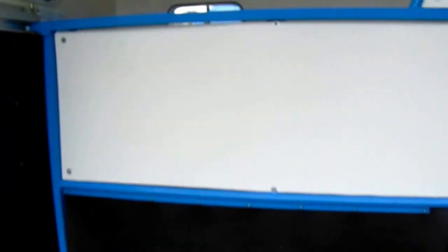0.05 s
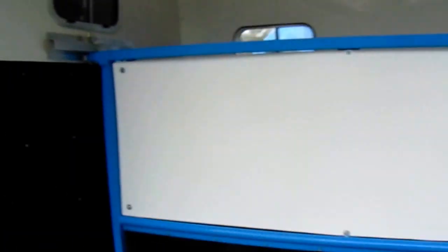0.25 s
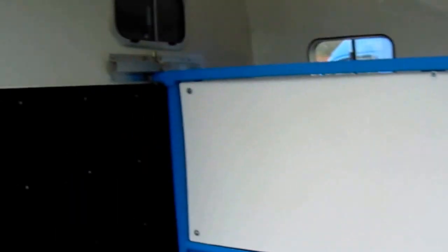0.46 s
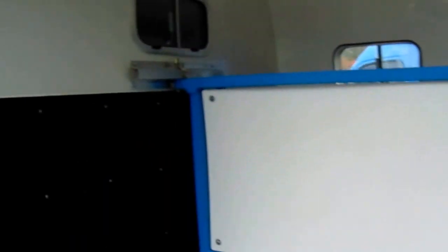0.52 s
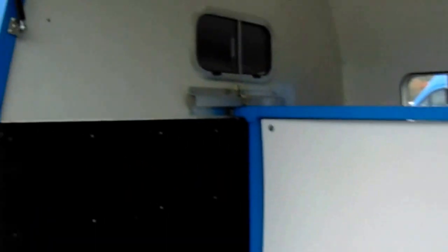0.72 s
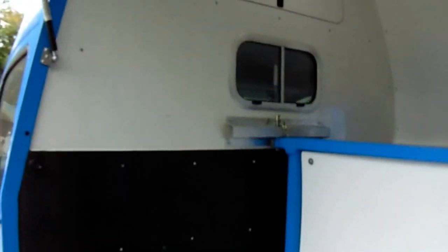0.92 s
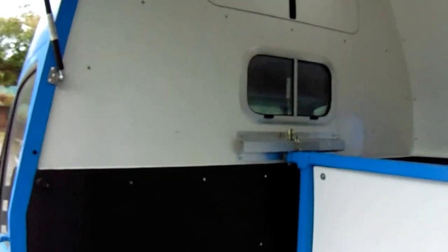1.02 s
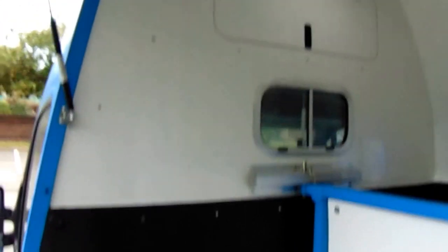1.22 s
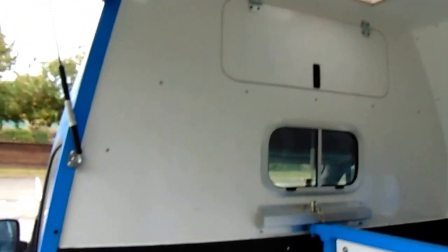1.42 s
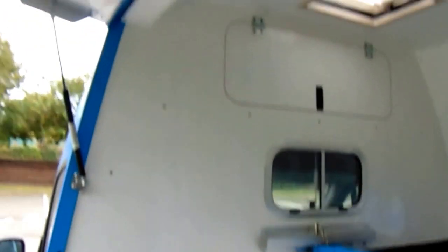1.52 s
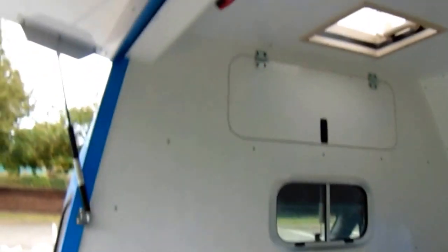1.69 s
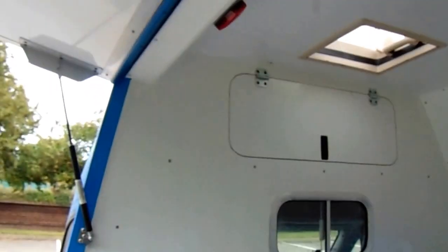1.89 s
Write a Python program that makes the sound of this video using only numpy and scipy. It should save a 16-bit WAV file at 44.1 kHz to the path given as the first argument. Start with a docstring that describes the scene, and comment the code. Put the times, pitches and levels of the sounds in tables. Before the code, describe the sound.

A van door bangs shut, heard from inside, followed by two soft footsteps.

```python
"""A door bangs shut on a parked van, heard from inside its bare load box.
The impact excites damped modes of the panels and a low boom of the enclosed air; the door
rebounds on its seal and the latch chatters. Two soft footfalls and faint rustles of cloth follow.
Distant traffic, a fine hiss, a thin whine and a little wind come in through the open side."""
import sys
import numpy as np
from scipy import signal
from scipy.fft import rfft, irfft
from scipy.io import wavfile

SR = 44100
rng = np.random.default_rng(int(sys.argv[2]) if len(sys.argv) > 2 else 0)


def store_pcm(level_fs):
    """Save levels as 16-bit WAV."""
    pcm = np.round(np.clip(level_fs, -1, 1) * 32767).astype(np.int16)
    wavfile.write(sys.argv[1], SR, np.atleast_2d(pcm).T)


N = 85995
T = np.arange(N) / SR
PANEL_ONSET_S = 0.2155

# Door meeting its frame: start_s, level_db, tilt_db_per_octave
DOOR_BLOWS = [(.2134, -4.5, 1.5), (.2168, 0.5, -0.5), (.2195, 0, 1.85), (.2268, -4, 0.5)]
# Crash spectrum of the door skin: frequency_hz, relative_db
CRASH_SPECTRUM = [(40, -20), (120, -24), (225, 2.5), (400, -9.5), (730, -3), (1150, -3.5), (1480, -9.5),
                  (1900, -9.5), (2600, -20), (3100, -14.5), (3900, -16.5), (4750, -26), (8000, -33),
                  (14000, -44)]
# Decay of the crash: frequency_hz, t60_s
CRASH_DECAY = [(100, 0.45), (300, 0.42), (700, 0.31), (1500, .22), (3500, 0.13), (12000, 0.2)]
# Modes of the wall panels and box: pitch_hz, level_db, t60_s
PANEL_MODES = [(76.3, -25, 0.63), (128.7, -24, 0.57), (172.4, -25, 0.665), (201.4, -18, .27),
               (270.4, -32.5, 0.47), (329.7, -21.5, 0.37), (448.5, -25.5, 0.43), (520, -30, 0.33),
               (605, -21.5, .2), (672, -33.5, 0.62), (722.3, -14, 0.17), (880.5, -29, .42),
               (922, -28, 0.38), (1006, -19, 0.17), (1164, -28, .3), (1200, -22, 0.25), (1757, -31, 0.45),
               (3450, -52, 0.072)]
# Door rebounding on its seal: start_s, level_db, tilt_db_per_octave
SEAL_REBOUNDS = [(.2532, -1, -2.5), (.2772, -2, 0), (.3110, -9.5, 1), (.3400, -9.5, -1.)]
# Dull spectrum of the rebounds and the swing: frequency_hz, relative_db
THUMP_SPECTRUM = [(40, -14), (130, 6.5), (330, 4.5), (800, -5.5), (1600, -17), (3500, -31), (12000, -58)]
THUMP_DECAY = [(100, 0.28), (2000, 0.051)]  # frequency_hz, t60_s
# Latch contacts: start_s, level_db, tilt_db_per_octave
LATCH_BLOWS = [(.2950, -8, 7), (.2997, -0.5, -.5), (.3020, -2.5, -1.5)]
# Latch resonances: frequency_hz, relative_db
LATCH_SPECTRUM = [(500, -8), (1550, 4), (2200, -2), (3200, -11), (4300, -5), (4750, 1), (5300, -1.5),
                  (6100, -14), (6900, -35), (14000, -22)]
LATCH_DECAY = [(1500, 0.23), (6000, 0.11)]  # frequency_hz, t60_s
# Feet on the floor: start_s, level_db, tilt_db_per_octave
FOOT_BLOWS = [(.8022, -2.5, -0.5), (1.5835, -4, 2)]
# Floor resonances: frequency_hz, relative_db
FLOOR_SPECTRUM = [(50, -25), (130, -3.5), (200, -5), (335, 1), (650, -5.5), (880, 0.5), (1400, -9),
                  (3500, -31), (12000, -47)]
FLOOR_DECAY = [(100, 0.37), (2000, 0.18)]  # frequency_hz, t60_s
# Slides of cloth: start_s, length_s, level_db, tilt_db_per_octave
CLOTH_SLIDES = [(0.414, 0.12, -44, 2), (.5, 0.12, -46.5, -1), (0.669, 0.043, -48, 6.),
                (0.907, 0.093, -46.5, 11)]
# Cloth friction spectrum: frequency_hz, relative_db
CLOTH_SPECTRUM = [(1500, -26), (3500, -3), (5200, 2.5), (6500, -13), (9800, -8.5), (14000, -15.5)]
# Far traffic spectrum: frequency_hz, relative_db
TRAFFIC_SPECTRUM = [(60, -17), (120, -10), (175, -9), (274, -4.5), (360, -8), (580, -7.5), (790, -1),
                    (1180, -2.5), (1700, -7), (2500, -13), (4000, -20.5), (7000, -27.5), (14000, -38)]
# Swell of the traffic: time_s, level_db
TRAFFIC_LEVELS = [(0, -39.5), (.15, -36), (.4, -38), (.7, -38.5), (1.1, -38.5), (1.4, -38), (1.95, -37.5)]
# Wind rumble spectrum: frequency_hz, relative_db
WIND_SPECTRUM = [(10, -8.5), (22, -8), (35, -1.5), (55, -7.5), (80, -2.5), (105, -12), (200, -23.5),
                 (500, -47), (2000, -80)]
# Gusts: time_s, level_db
WIND_LEVELS = [(0, -32.5), (.08, -35), (.17, -42.5), (.45, -39.5), (.72, -42), (.9, -41), (1.02, -45),
               (1.55, -45.5), (1.68, -39), (1.86, -36.5), (1.95, -41)]
# Flat hiss spectrum: frequency_hz, relative_db
HISS_SPECTRUM = [(1000, -1), (7000, -1), (14000, -1)]
# Drift of the hiss: time_s, level_db
HISS_LEVELS = [(0, -50.5), (.15, -47.5), (.35, -48.5), (.8, -53.5), (1.15, -52), (1.55, -50.5), (1.95, -55)]
# Partials of the whine: start_s, length_s, first_hz, last_hz, level_db
WHINE_PARTIALS = [(1.22, 0.48, 12200, 11680, -62), (1.24, 0.45, 10600, 10830, -64.5),
                  (1.38, 0.46, 10330, 9940, -62), (1.377, 0.49, 5980, 6070, -61.5),
                  (1.58, 0.2, 11050, 11100, -62), (1.328, .42, 14050, 14030, -63)]


def door_crash():
    """Impact excitation: brief contacts with the frame drive the door skin over a wide band."""
    return amp(11.5) * impacts(DOOR_BLOWS, CRASH_SPECTRUM, CRASH_DECAY, build_s=0.0003, direct_db=-8)


def door_swing(length_s=0.032):
    """Air displacement: a dull rush grows just before the door lands."""
    ramp = np.clip(1 - (PANEL_ONSET_S - T) / length_s, 0, 1) * (T < PANEL_ONSET_S)
    return amp(-32.5) * noise(THUMP_SPECTRUM) * ramp


def panel_ring(rise_s=0.001):
    """Modal superposition: the struck panels ring as a sum of damped sinusoids."""
    ring = sum(amp(db) * decay(T, t60_s) * np.sin(2 * np.pi * (hz * T + rng.random()))
               for hz, db, t60_s in PANEL_MODES)
    attack = 1 - np.exp(-T / rise_s)
    return place(PANEL_ONSET_S, amp(1) * ring * attack)


def seal_rebounds():
    """Elastic rebound: the door bounces on its soft seal in dull thumps."""
    return amp(8) * impacts(SEAL_REBOUNDS, THUMP_SPECTRUM, THUMP_DECAY, build_s=0.00085, direct_db=-5.5)


def latch_chatter():
    """Hard contact: quick blows excite the high resonances of the latch."""
    return amp(-3) * impacts(LATCH_BLOWS, LATCH_SPECTRUM, LATCH_DECAY, build_s=0.00043, direct_db=-0.5)


def air_boom(start_s=0.2285, pitch_hz=38.2, rise_s=0.039, t60_s=0.57):
    """Cavity resonance: air squeezed into the box oscillates slowly and dies away."""
    envelope = np.minimum(T / rise_s, 1) * decay(T, t60_s)
    return place(start_s, amp(-17.5) * envelope * np.sin(2 * np.pi * pitch_hz * T))


def footfalls():
    """Structure-borne sound: soft steps excite the hollow floor."""
    return impacts(FOOT_BLOWS, FLOOR_SPECTRUM, FLOOR_DECAY, build_s=0.0016, direct_db=-10)


def clothing(ramp_s=0.023, fade_db=-4):
    """Sliding friction: cloth gives short bursts of noise that swell and fade."""
    out = np.zeros(N)
    for start_s, length_s, db, tilt_db in CLOTH_SLIDES:
        t = T[:round(length_s * SR)]
        edges = np.clip(np.minimum(t, length_s - t) / ramp_s, 0, 1)
        friction = unit(colour(rng.standard_normal(N), CLOTH_SPECTRUM, tilt_db))[:len(t)]
        out += place(start_s, amp(db + fade_db * t / length_s) * edges * friction)
    return out


def traffic():
    """Incoherent addition: distant vehicles merge into one smooth noise."""
    return noise(TRAFFIC_SPECTRUM) * contour(TRAFFIC_LEVELS)


def wind():
    """Turbulence: gusts make a low, uneven rumble."""
    return noise(WIND_SPECTRUM) * contour(WIND_LEVELS)


def hiss():
    """White noise: equal power per hertz, at a slowly drifting level."""
    return noise(HISS_SPECTRUM) * contour(HISS_LEVELS)


def whine(flutter_hz=110):
    """Random amplitude modulation: faint gliding partials spread into narrow bands."""
    out = np.zeros(N)
    lowpass = signal.butter(2, flutter_hz, fs=SR, output="sos")
    for start_s, length_s, first_hz, last_hz, db in WHINE_PARTIALS:
        progress = np.clip((T - start_s) / length_s, 0, 1)
        swell = np.sqrt(2 * abs(np.sin(np.pi * progress)))
        flutter = unit(signal.sosfilt(lowpass, rng.standard_normal(N)))
        cycles = np.cumsum(first_hz + (last_hz - first_hz) * progress) / SR
        out += amp(db) * swell * flutter * np.sin(2 * np.pi * cycles)
    return out


def impacts(blows, spectrum, decay_times, build_s, direct_db, size=32768):
    """Reverberation: each blow is a direct pulse, then dense wall reflections dying band by band."""
    out = np.zeros(N)
    t, hz = T[:size], np.fft.rfftfreq(size, 1 / SR)
    centres_hz = np.geomspace(60, 15000, 9)
    bands = [np.interp(np.log(hz + 1), np.log(centres_hz), row) for row in np.eye(len(centres_hz))]
    for start_s, db, tilt_db in blows:
        scatter = rfft(rng.choice([-1., 1.], size))
        tail = sum(irfft(scatter * band) * decay(t, read(decay_times, centre_hz))
                   for centre_hz, band in zip(centres_hz, bands))
        tail = colour(tail * (1 - np.exp(-t / build_s)), spectrum, tilt_db)
        direct = colour(signal.unit_impulse(size), spectrum, tilt_db)
        blow = unit(tail) + amp(direct_db) * unit(direct)
        out += place(start_s, amp(db) * blow / np.linalg.norm(blow))
    return out


def colour(x, spectrum, tilt_db, size=4096):
    """Minimum-phase filtering by a spectrum, tilted around roughly 1 kHz."""
    hz = abs(np.fft.fftfreq(size, 1 / SR))
    octaves = np.log2((hz + 100) / 1000)
    log_gain = np.log(amp(read(spectrum, hz) + tilt_db * octaves))
    response = np.exp(np.conj(signal.hilbert(log_gain)))
    return signal.fftconvolve(x, np.fft.ifft(response).real)[:len(x)]


def noise(spectrum):
    """Spectral shaping of white noise, at rms 1."""
    gain = amp(read(spectrum, np.fft.rfftfreq(N, 1 / SR)))
    return unit(irfft(rfft(rng.standard_normal(N)) * gain, N))


def read(points, hz):
    """Interpolation on a log-frequency axis."""
    points_hz, values = np.transpose(points)
    return np.interp(np.log(hz + 1), np.log(points_hz + 1), values)


def contour(levels):
    """Gain over time, interpolated in decibels."""
    return amp(np.interp(T, *np.transpose(levels)))


def decay(t, t60_s):
    """Exponential damping: 60 dB down after t60_s."""
    return amp(-60 * t / t60_s)


def place(start_s, sound):
    """Time delay within N samples of silence."""
    return np.pad(sound, (round(start_s * SR), N))[:N]


def amp(db):
    """Decibels to amplitude ratio."""
    return 10 ** (np.asarray(db) / 20)


def unit(x):
    """Normalisation to rms 1."""
    return x / np.sqrt(np.mean(x ** 2) + 1e-20)


def scene():
    """Superposition: all sources add at one point inside the van."""
    slam = door_crash() + door_swing() + panel_ring() + seal_rebounds() + latch_chatter() + air_boom()
    return (slam + footfalls() + clothing() + traffic() + wind() + hiss() + whine())[None]


def record(dry):
    """Band limiting: a linear-phase low-pass removes the highest treble."""
    cutoff_hz = 14250
    lowpass = signal.firwin(511, cutoff_hz, window=("kaiser", 9), fs=SR)
    return signal.oaconvolve(dry, lowpass[None], "same")


dry = scene()
out = record(dry)
store_pcm(out)
```